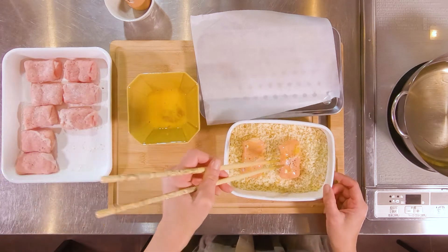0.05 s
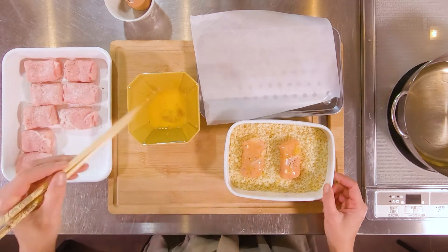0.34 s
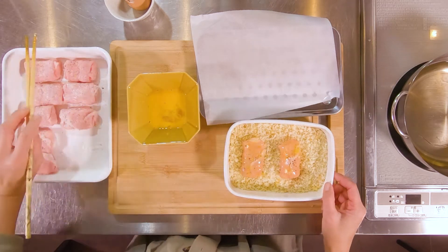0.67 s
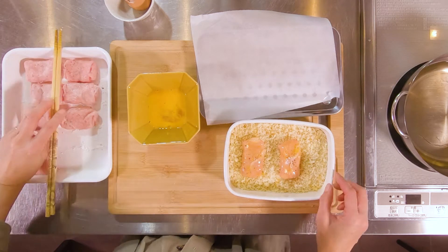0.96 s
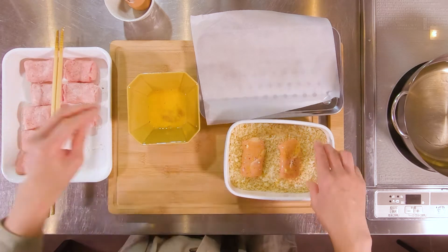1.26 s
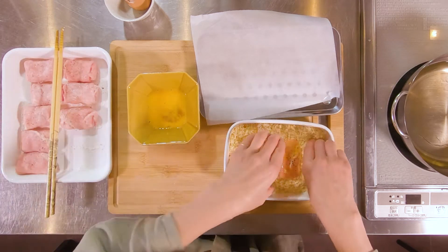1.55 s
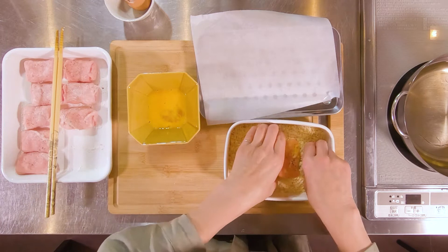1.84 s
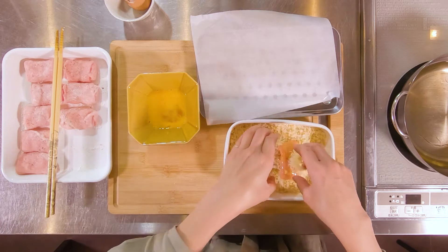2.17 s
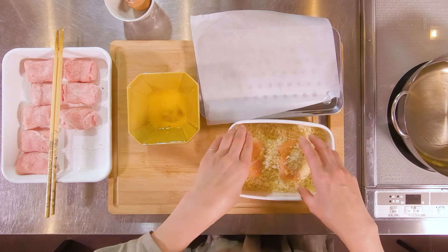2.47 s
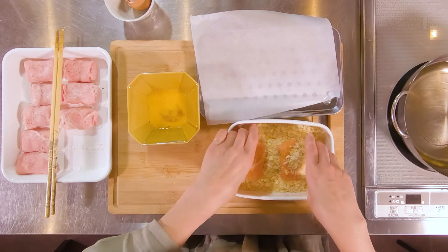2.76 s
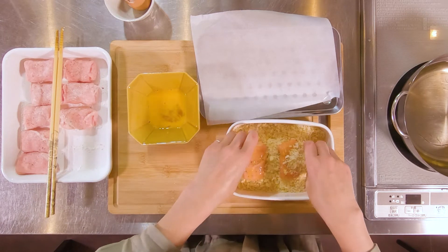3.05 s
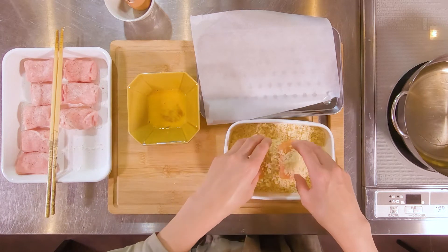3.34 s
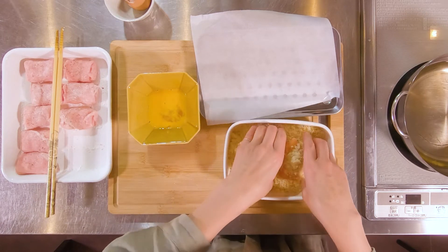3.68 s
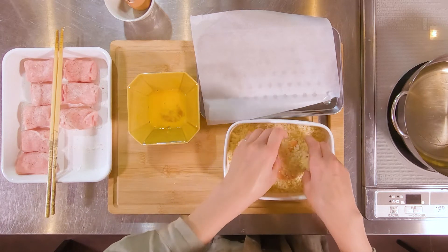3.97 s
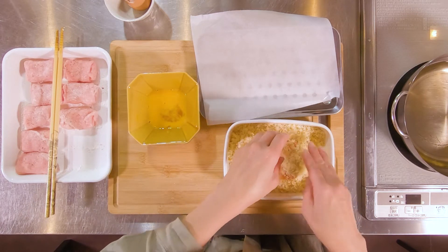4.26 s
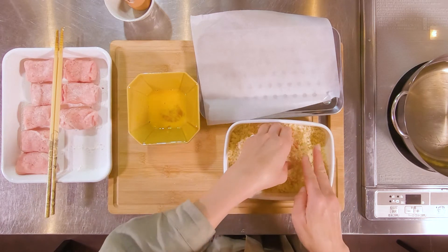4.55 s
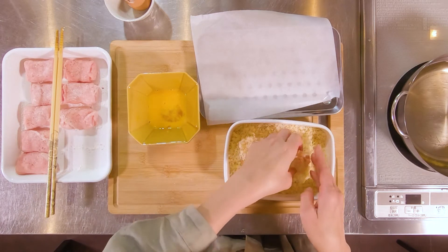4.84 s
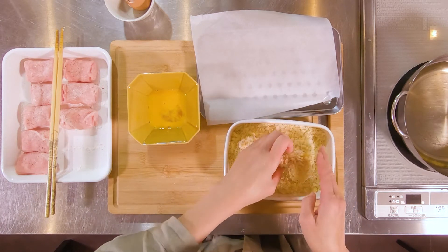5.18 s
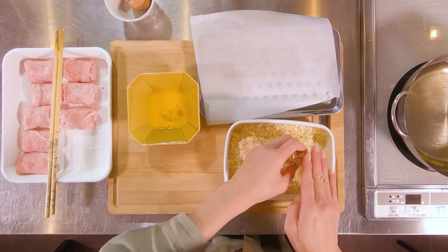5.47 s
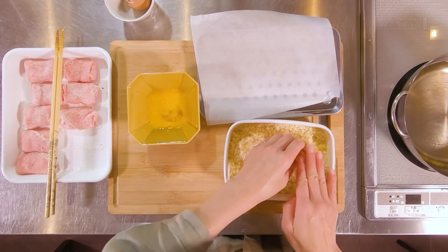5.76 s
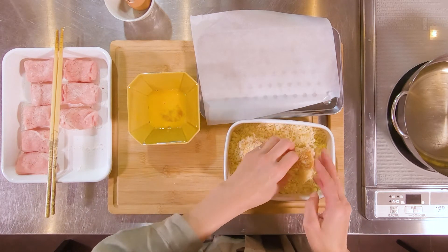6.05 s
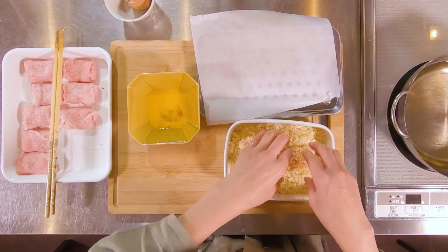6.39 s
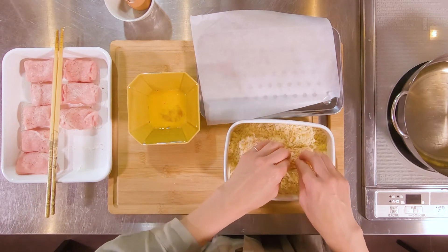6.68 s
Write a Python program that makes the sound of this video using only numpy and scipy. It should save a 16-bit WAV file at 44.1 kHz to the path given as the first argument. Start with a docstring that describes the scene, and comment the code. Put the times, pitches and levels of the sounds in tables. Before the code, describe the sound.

A kitchen fan hums steadily with a faint whine in a slightly echoing room. Near the microphone, chopsticks tick together and drop onto a tray in a short, bright clatter, the loudest sound. Quieter work follows: dry breadcrumbs sift, crackle and crunch in uneven strokes as hands pack them onto meat, with a few fingertip ticks, one soft squeak and occasional dull knocks of the dish on a wooden board.

```python
"""Long bamboo chopsticks click in a cook's hand and clatter onto a tray, each bounce ringing shaft and tip.
Then the hands scoop dry breadcrumbs over meat rolls and press them on: a crunch of countless tiny breaks. Now
and then the dish bumps on its wooden board, and once a finger rubs along its wall with a soft squeak. A kitchen
fan drones underneath with a thin whine, and the hard-walled room answers the cook's work."""
import sys
import numpy as np
from scipy import signal
from scipy.fft import rfft, irfft, next_fast_len
from scipy.io import wavfile
from scipy.ndimage import map_coordinates

SR = 44100
rng = np.random.default_rng(int(sys.argv[2]) if len(sys.argv) > 2 else 0)


def master_out(mix):
    """Clip the mix to full scale and print it as 16-bit PCM to the path in sys.argv[1]."""
    frames = np.transpose(np.atleast_2d(mix))
    ceiling = np.clip(frames, -1, 1)
    pcm = np.round(ceiling * 32767).astype(np.int16)
    wavfile.write(sys.argv[1], SR, pcm)


N = 305172

# Colour of the fan's rushing air and of the hiss above it: (frequency [Hz], gain [dB])
AIR_EQ = [(25, -33), (48, -22.5), (70, -35), (110, -29), (150, -11), (235, -3.5), (268, -12), (330, -12),
          (390, -20), (520, -21.5), (800, -21.5), (1050, -24.5), (1550, -25), (2200, -33.5), (3600, -60)]
HISS_EQ = [(1500, -12), (3000, 7.5), (5600, 2), (7000, 0), (9000, 0.5), (12000, -7), (13500, -19.5),
           (15000, -43)]
# Stereo image of the air: (frequency [Hz], left-right likeness [0-1])
AIR_IMAGE = [(40, 0.85), (200, 0.87), (330, 0.97), (550, 0.26), (950, 0.03), (1400, 0.094), (2200, 0.23),
             (4000, .4)]
# The fan's duct tones: (pitch [Hz], width [Hz], level [dB])
DUCT_TONES = [(153.9, 12, -57), (198.9, 11, -46.5), (295.2, 12, -52), (448, 6.5, -73), (583, 3.4, -68),
              (787, 4.5, -63.5)]
# Slow swell of the air and duct tones: (time [s], gain [dB])
FAN_SWELL = [(0, -2), (0.7, 3), (2.0, -0.5), (2.7, 1.5), (5.0, 1), (6.92, 1.5)]
# Fades of the fan's whine: (time [s], level [dB])
WHINE_FADES = [(0, -59), (0.65, -45), (1.2, -48.5), (2.1, -53.5), (2.55, -50.5), (3.35, -55), (4.05, -51.5),
               (4.95, -56), (5.8, -54), (6.4, -53), (6.92, -50.5)]
WHINE_HZ = 749.4

# Chopsticks touching in the hand: (time [s], level [dB], lows [dB], highs [dB])
STICK_CLICKS = [(0.076, -59.5, -9, 13), (0.2948, -27.5, -4, -0.5), (0.299, -35.5, -3.5, -2.5),
                (.715, -39.5, 20.5, -4.5)]
# Ring of the held sticks: (frequency [Hz], width [Hz], gain [dB])
HELD_STICK_MODES = [(1580, 180, -17.5), (2160, 200, -16.5), (2760, 240, -11.5), (3913, 110, -6),
                    (4200, 160, -11), (5090, 180, -2.5), (5378, 150, -5), (6120, 200, -2.5),
                    (6606, 140, -1.5), (6950, 110, -7), (7520, 150, -7.5), (7900, 140, -5.5),
                    (9370, 240, -7.5), (10710, 300, -9), (12660, 980, -18.5)]
# Sticks sliding through the fingers: (time [s], level [dB], pitch [Hz], t60 [s])
STICK_SLIDES = [(0.446, -46.5, 6440, 0.15), (0.474, -48.5, 4800, 0.21), (0.531, -41.5, 3200, 0.16)]
# Sticks landing and bouncing: (time [s], level [dB], lows [dB], highs [dB], tray gain [dB],
# shaft mode [Hz], shaft gain [dB], tip mode [Hz], tip gain [dB], lingering ring [dB])
STICK_LANDINGS = [(0.7526, -10.5, 1.5, -2.5, -17, 3250, -11, 7900, -24.5, -50.5),
                  (0.845, -7.5, -5, -6.5, 11.5, 5000, -1.5, 9480, -11.5, -36),
                  (0.8609, -5.5, 6, 4.5, 7.5, 3100, -8, 8650, -20, -34),
                  (0.9269, -5.5, -2.5, 5.5, 28, 4880, -9, 9000, -18, -37)]
# Ring of a dropped stick: (frequency [Hz], width [Hz], gain [dB])
DROPPED_STICK_MODES = [(679, 220, -9.5), (1241, 190, -5.5), (2352, 300, -.5), (2760, 84, 0.5),
                       (3047, 60, 2), (3350, 108.5, 6), (4360, 600, -6.5), (4920, 230, -1.5),
                       (5410, 250, -1), (5920, 74, 7), (6650, 120, 1.5), (6800, 66, -4), (7800, 350, -6.5),
                       (9550, 240, -8.5), (10290, 300, -18.5), (11250, 180, -9.5), (12770, 260, -14.5)]
# Colour of the shaken tray: (frequency [Hz], gain [dB])
TRAY_EQ = [(100, -43.5), (280, -12), (400, -3.5), (560, 0), (760, -2.5), (1100, -3.5), (1800, -5.5),
           (2300, -1.5), (3700, 1), (4600, 0.5), (5600, -5), (7100, -9), (8600, -4), (10300, -22),
           (14400, -29.5)]
# Lingering ring of the loose sticks on the tray: (frequency [Hz], t60 [s], gain [dB])
LINGERING_MODES = [(2078, .45, -11), (2188, .4, -9), (2446, .35, -8), (2725, .35, -7), (2827, .4, -6),
                   (2900, .62, -6), (3042, .4, -7), (3168, .35, -7), (3316, .35, -9), (3688, .5, -9),
                   (4559, .35, -7), (4716, .42, -5), (5253, .42, 8), (5748, .3, -9), (7800, .35, -10)]
# The sticks lie off to one side: (frequency [Hz], phase lead of the left channel [rad])
STICK_PHASE_LEAD = [(300, 0.2), (3000, 0.9), (5200, -2), (9000, -3), (14000, -2)]
SHAFT_WIDTH_HZ, TIP_WIDTH_HZ = 340, 290  # damping of the two modes that a blow favours
STICK_LOW_HZ, STICK_HIGH_HZ = 217.6, 12500  # thin bamboo radiates little outside this range

# Hand strokes through the crumbs: (time [s], rise [s], hold [s], crush level [dB],
# fine crumbs over crush [dB], dish wall over crush [dB])
HAND_STROKES = [(1.284, 0.18, 0.034, -45, -2.5, -7), (1.589, .02, 0.036, -50, -3, -3),
                (1.689, 0.053, 0.15, -43.5, -7.5, -11.5), (1.983, 0.066, 0.19, -68.5, 3, -12),
                (2.308, 0.053, 0.025, -56, -6, -3.5), (2.498, 0.054, 0.084, -51, 0.5, -0.5),
                (2.624, 0.047, .035, -45, 2, -5), (2.771, 0.045, 0.038, -44, -3, -3.5),
                (2.874, 0.032, 0.06, -49.5, 0, 3.5), (3.004, 0.084, 0.19, -66.5, 4, -12.5),
                (3.548, 0.048, 0.046, -39, -5, -5.5), (3.773, 0.056, 0.096, -55, -2.5, -16),
                (3.938, 0.055, 0.22, -65, 1.5, -8.5), (4.328, 0.043, 0.23, -47.5, -7.5, -7.5),
                (4.572, 0.1, 0.038, -43, -8.5, -13), (4.79, 0.035, 0.18, -57.5, 2.5, -9.5),
                (5.297, 0.031, 0.034, -53, -4, -5), (5.669, 0.16, 0.11, -59, -10, -14)]
# Quick squeezes of a heap: (time [s], burst level [dB], burst length [s], cupped-hand gain [dB],
# crush level of the bed below [dB], fine crumbs over crush [dB])
HEAP_SQUEEZES = [(1.52, -44, 0.051, -23, -49.5, 4), (1.537, -39.5, 0.013, -10, -57, -2),
                 (2.307, -61, 0.022, -10, -56, -3), (3.677, -40, 0.027, -13, -39.5, -9),
                 (3.749, -41.5, 0.031, -2.5, -37, -15.5), (4.353, -46, 0.056, 3, -52.5, -3.5),
                 (5.064, -40, 0.041, 6, -38, -8.5), (5.514, -52, 0.016, 0.5, -53.5, -4),
                 (5.547, -36.5, 0.027, -0.5, -39.5, -4.5), (5.982, -51.5, 0.042, 12, -43.5, -10),
                 (6.026, -50, 0.043, 8, -45, -9), (6.61, -47, 0.043, 6, -43.5, -10),
                 (6.817, -51, 0.041, 3.5, -45, -9), (6.839, -38.5, 0.035, 13, -39.5, -11.5)]
# Colour of coarse crumbs crushing, fine ones sifting and a heap giving way: (frequency [Hz], gain [dB])
CRUSH_EQ = [(300, -18), (600, -6.5), (1000, 5), (1650, 7), (2000, 3), (2300, 6.5), (2650, 3), (3250, 4),
            (4400, -9.5), (6000, -7.5), (9000, -27.5), (14000, -40)]
SIFT_EQ = [(2000, -18), (4000, -2), (5800, 1), (7200, -1.5), (8400, 1.5), (9600, 2), (10500, -7),
           (12500, -6), (14000, -19), (15500, -24)]
HEAP_EQ = [(500, -21), (1000, -12.5), (2200, 11), (3200, 12), (4400, 11.5), (6000, -4), (9500, 3.5),
           (14000, -17)]
# Stereo image of the crumbs: (frequency [Hz], left-right likeness [0-1])
CRUMB_IMAGE = [(400, 0.6), (1100, 0.395), (2200, 0.627), (3800, 1), (6000, 0.17), (12000, .15)]
# Large flakes, one row a size: (pitch [Hz], width [Hz], level over the crumbs around them [dB])
FLAKE_BANDS = [(2306, 1100, -17), (3453, 1800, -16), (5280, 2300, -12), (8620, 1500, -15.5)]
# Hollow of a hand cupped over the dish: (frequency [Hz], width [Hz], gain [dB])
CUPPED_HAND_MODES = [(1635, 74, 11), (2395, 1400, -11), (2880, 130, -11), (4260, 120, -22)]
# Lone crumbs snapping: (time [s], level [dB], pitch [Hz])
CRUMB_SNAPS = [(1.361, -46, 8650), (1.371, -45, 5200), (2.523, -54, 8400), (3.268, -53.5, 8560),
               (4.757, -42.5, 8500), (5.857, -48.5, 8600), (6.628, -62, 8600), (6.825, -48, 8300)]
STROKE_SAG_DB_PER_S, STROKE_RELEASE_DB_PER_S = 19, 126  # crumbs pack down, then come to rest
BED_RISE_S, BED_HOLD_S, BED_RELEASE_DB_PER_S = 0.018, 0.0031, 324  # the bed gives way under a squeeze
BED_WALL_DB, REST_DB = -14, -100  # wall scrape over the crush in a squeeze; envelope floor
COARSE_ONSET, FINE_ONSET = 1.4, 0.85  # attack exponents: coarse crumbs need force, fine ones stir at once

# The dish bumping on the board: (time [s], knock level [dB], thump over knock [dB], thud level [dB])
DISH_BUMPS = [(1.3951, -24, 0, -43), (2.529, -34.5, 8, -50), (2.894, -37.5, 10, -49),
              (3.789, -28.5, 5, -58), (3.858, -40.5, 7, -50), (4.6426, -28, 4.5, -47),
              (4.69, -44, 13, -55.5), (6.8535, -20, 0, -43)]
# Fingertips ticking on the dish: (time [s], level [dB], lows [dB], highs [dB])
FINGER_TAPS = [(3.102, -47.5, -10, 27), (5.022, -36.5, 7.5, 18.5), (5.14, -46, -14, 7),
               (5.226, -45, 13, 11)]
# The dish's bright ring, its dull knock and the board's thump: (frequency [Hz], width [Hz], gain [dB])
DISH_RING_MODES = [(718, 9, 12.5), (1518, 53, 5.5), (2199, 46, 4.5), (2830, 38, 0), (3170, 90, -1),
                   (3560, 20, 4.5), (3836, 40, -3), (4430, 44, -1), (5170, 89, -8.5), (6340, 52, -8),
                   (8130, 70, -5)]
DISH_KNOCK_MODES = [(490, 84, -2.5), (660, 114, -3), (917, 94, 3), (1187, 116, 5), (1540, 230, -2.5)]
BOARD_MODES = [(143, 29.6, 17.5), (189, 39, 13), (313, 100, -23), (439, 55, -9.5)]
KNOCK_HZ, KNOCK_HARDENING = 4500, 0.5  # cutoff of a full-scale knock; it follows this power of the force
TICK_CRACK_DB = -0.5  # dry crack of a tick, over the dish's ring
WORKTOP_HZ, WORKTOP_RISE_S, WORKTOP_T60_S = 66.5, 0.012, 0.2  # the deep mode under the board
RUB_S, RUB_RISE_S, RUB_HOLD_S, RUB_DB = 2.53, 0.042, 0.11, -51
SQUEAK_S, SQUEAK_RISE_S, SQUEAK_HOLD_S, SQUEAK_DB, SQUEAK_HZ = 2.615, 0.04, 0.057, -44, 720

# Early reflections off the steel worktop and the wall: (left delay [s], right delay [s], gain [dB])
REFLECTIONS = [(.0021, .0022, -16), (.0037, .0036, -15), (.0058, .0061, -16), (.0094, .0089, -16)]
# Reverb time of the kitchen: (frequency [Hz], t60 [s])
ROOM_DECAY = [(200, 0.4), (700, 0.63), (2500, 0.59), (5000, 0.53), (8000, 0.45), (13000, 0.43)]
# Stereo image of the reverb: (frequency [Hz], left-right likeness [0-1])
ROOM_IMAGE = [(200, 0.42), (550, 0.38), (1100, 0.63), (2200, 0.63), (4000, 0.12), (6000, 0.01216),
              (12000, 0.098)]
# Colour of the microphone pair: (frequency [Hz], left minus right [dB])
MIC_BALANCE = [(200, -.5), (1000, 1), (5500, -0.5), (7600, -3.5), (10000, -5.5), (14000, 2.5)]
TOP_HZ = 14900

IMPULSE = signal.unit_impulse(SR // 8)


def amp(db):
    """Decibels to linear gain."""
    return 10 ** (np.asarray(db) / 20)


def unit(x):
    """Normalise to an rms of 1."""
    return x / np.sqrt(np.mean(x ** 2) + 1e-20)


def along(points, hz):
    """Read a (frequency, value) curve on a log axis."""
    freqs, values = np.transpose(points)
    return np.interp(np.log(hz + 1), np.log(freqs + 1), values)


def wobble(rate):
    """A smooth random modulator with rate knots a second."""
    steps = np.arange(0, N + 32, 32)
    knots = rng.standard_normal(2048)
    return np.interp(np.arange(N), steps, map_coordinates(knots, [steps * rate / SR], mode="wrap"))


def filtered(x, response):
    """Filter x by a complex response, a function of frequency."""
    n = x.shape[-1]
    padded = next_fast_len(n + SR // 8, True)
    return irfft(rfft(x, padded) * response(np.fft.rfftfreq(padded, 1 / SR)), padded)[..., :n]


def resonate(x, modes):
    """Play x through a bank of resonators of alternating polarity."""
    return filtered(x, lambda f: sum((-1) ** k * amp(db) * 1j * f * width / (hz**2 - f**2 + 1j * f * width)
                                     for k, (hz, width, db) in enumerate(modes)))


def band(x, hz, width):
    """A broad resonance with steep skirts."""
    return resonate(resonate(x, [(hz, width, 0)]), [(hz, width, 0)])


def causal(gain):
    """The minimum-phase response with this gain: no ringing ahead of the hit."""
    cepstrum = irfft(np.log(gain + 1e-6))
    half = len(cepstrum) // 2
    return np.exp(rfft(np.r_[cepstrum[0], 2 * cepstrum[1:half], np.zeros(half)]))


def spread(pair, eq, image):
    """Two unrelated signals become mid and side of a coloured stereo sound of rms 1."""
    def mid_side_gains(hz):
        angle = np.arccos(np.clip(along(image, hz), -1, 1)) / 2
        return amp(along(eq, hz)) * [np.cos(angle), np.sin(angle)]
    mid, side = filtered(pair, mid_side_gains)
    return unit(np.array([mid + side, mid - side]))


def add(track, s, sound):
    """Mix a sound into a stereo track at s seconds."""
    start = max(round(s * SR), 0)
    track[:, start:start + sound.shape[-1]] += sound[:, :max(N - start, 0)]


def blow(t60, rattle_db, rattle_t60, width):
    """Stereo force of one contact: a short crack with a weaker, longer chatter."""
    t = np.arange(SR * 3 // 5) / SR
    noise = rng.standard_normal((3, len(t)))
    return (noise[0] + width * noise[1:]) * (amp(-60 * t / t60) + amp(rattle_db - 60 * t / rattle_t60))


def firm(force, point_db):
    """A hard contact: one clean impulse ahead of its chatter."""
    return force / np.linalg.norm(force[0]) + amp(point_db) * signal.unit_impulse(force.shape[-1])


def tinted(hit, low_db, high_db):
    """Where a body is struck sets the weight of its low and high modes."""
    tilt = [(900, low_db), (2800, low_db / 2), (5000, 0), (9000, high_db), (14500, high_db - 5)]
    return filtered(hit, lambda hz: causal(amp(along(tilt, hz))))


def sized(hit, db):
    """Give a hit the energy of two milliseconds at db."""
    return hit * amp(db) * np.sqrt(0.002 * SR / np.mean(np.sum(hit ** 2, -1)))


def fan():
    """Rushing air and fuzzy duct tones swell together over a faint hiss."""
    t = np.arange(N) / SR
    swell = amp(np.interp(t, *np.transpose(FAN_SWELL)))
    air = amp(-45) * spread(rng.standard_normal((2, N)), AIR_EQ, AIR_IMAGE)
    tones = 0
    for hz, width, db in DUCT_TONES:
        steady = (5 / width) ** 2  # narrow tones hold steadier than wide ones
        flutter = steady + wobble(2 * width) + 1j * wobble(2 * width)
        tones += amp(db) * unit(np.real(flutter * np.exp(2j * np.pi * hz * t)))
    hiss = amp(-70) * spread(rng.standard_normal((2, N)), HISS_EQ, image=[(3000, 0.41), (7000, 0.026)])
    return swell * (air + tones) + hiss


def fan_whine():
    """One thin, clean tone of the fan, swelling and fading."""
    t = np.arange(N) / SR
    hz = WHINE_HZ + 0.69 * wobble(3)
    level_db = np.interp(t, *np.transpose(WHINE_FADES)) + 0.6 * wobble(7)
    return amp(level_db) * unit(np.sin(2 * np.pi * np.cumsum(hz) / SR))


def sticks_in_hand():
    """The carried chopsticks click together and swish through the fingers."""
    out = np.zeros((2, N))
    t = np.arange(SR // 2) / SR
    ring = resonate(IMPULSE, HELD_STICK_MODES)
    for s, db, low_db, high_db in STICK_CLICKS:
        force = blow(t60=0.011, rattle_db=-16, rattle_t60=0.0786, width=1)
        click = sized(tinted(ring, low_db, high_db), db)
        add(out, s, struck(click, force, wet_db=1, left_db=-3))
    for s, db, hz, t60 in STICK_SLIDES:
        friction = rng.standard_normal((2, len(t)))
        skin = filtered(friction, lambda f: 1 / (1 + (f / 10500) ** 8))  # soft fingers make little top
        envelope = amp(db - 60 * t / t60) * (1 - np.exp(-t / 0.005))
        add(out, s, kitchen(unit(band(skin, hz, 0.99 * hz)) * envelope, wet_db=-0.5))
    return out


def struck(ring, force, wet_db, left_db):
    """A ringing body is hit: direct sound from one side, reverb from all round."""
    direct = force / np.linalg.norm(force[0]) * amp([[left_db / 2], [-left_db / 2]])
    return signal.fftconvolve(direct + amp(wet_db) * room_tail(), ring[None], axes=1)


def room_tail(build_s=0.0051):
    """A fresh stereo reverb tail of energy 1 that blooms and hangs longest in the mids."""
    noise = spread(rng.standard_normal((2, SR * 3 // 5)), eq=[(1, 0)], image=ROOM_IMAGE)
    hz, t, spectra = signal.stft(noise, SR, nperseg=256)
    envelope = amp(-60 * t / along(ROOM_DECAY, hz)[:, None]) * (1 - np.exp(-t / build_s))
    _, tail = signal.istft(spectra * envelope, SR, nperseg=256)
    return tail[:, :noise.shape[-1]] / np.linalg.norm(tail[0])


def kitchen(x, wet_db):
    """The dry sound plus the hard walls' reverb, sent from its left channel."""
    return x + amp(wet_db) * signal.fftconvolve(x[:1], room_tail(), axes=1)[:, :x.shape[-1]]


def early_reflections(x):
    """Near hard surfaces send back weak copies, which comb the spectrum."""
    return filtered(x, lambda hz: 1 + sum(amp(db) * np.exp(-2j * np.pi * np.outer(delays, hz))
                                          for *delays, db in REFLECTIONS))


def stick_clatter():
    """Tips land first, then shafts bounce and shake the tray; each contact favours its own modes."""
    clacks, ring = np.zeros((2, 2, N))
    stick = unit(resonate(IMPULSE, DROPPED_STICK_MODES))
    tray = unit(filtered(IMPULSE, lambda hz: causal(amp(along(TRAY_EQ, hz)))))
    for s, db, low_db, high_db, tray_db, shaft_hz, shaft_db, tip_hz, tip_db, ring_db in STICK_LANDINGS:
        body = unit(tinted(stick + amp(tray_db) * tray, low_db, high_db))
        shaft = amp(shaft_db) * unit(resonate(IMPULSE, [(shaft_hz, SHAFT_WIDTH_HZ, 0)]))
        tip = amp(tip_db) * unit(resonate(IMPULSE, [(tip_hz, TIP_WIDTH_HZ, 0)]))
        force = firm(blow(t60=0.023, rattle_db=-7, rattle_t60=0.07, width=0.71), point_db=-5)
        add(clacks, s, struck(sized(body + shaft + tip, db), force, wet_db=-1.5, left_db=-4.5))
        add(ring, s, amp(ring_db) * lingering_ring())
    radiated = filtered(clacks, lambda hz: (1j * hz / (STICK_LOW_HZ + 1j * hz)) ** 2
                        / np.sqrt(1 + (hz / STICK_HIGH_HZ) ** 20))
    placed = filtered(radiated, lambda hz: np.exp(0.5j * np.outer([1, -1], along(STICK_PHASE_LEAD, hz))))
    return ring + placed


def lingering_ring():
    """The sticks' long-lived modes sing on, varying a little from blow to blow and from left to right."""
    t = np.arange(SR * 3 // 5) / SR
    ring = 0
    for hz, t60, db in LINGERING_MODES:
        phase = rng.uniform(0, 2 * np.pi) + rng.normal(0, 0.5, (2, 1))
        ring += amp(db + rng.normal(0, 1.5) - 60 * t / t60) * np.sin(2 * np.pi * hz * t + phase)
    return ring * (1 - np.exp(-t / 0.002))


def push(s, rise, hold, release_db_per_s, onset):
    """Pressure envelope of one push: it builds, sags while held and is let go."""
    t = np.arange(N) / SR - s
    held = np.maximum(t - rise, 0)
    fall_db = STROKE_SAG_DB_PER_S * held + release_db_per_s * np.maximum(held - hold, 0)
    return np.clip(t / rise, 0, 1) ** onset * amp(np.maximum(-fall_db, REST_DB))


def hand_envelopes():
    """Envelopes in dB for crush, sift and wall scrape; overlapping pushes add in power."""
    power = np.full((3, N), amp(REST_DB) ** 2)
    for s, rise, hold, db, fine_db, wall_db in HAND_STROKES:
        coarse = amp(db) * push(s, rise, hold, STROKE_RELEASE_DB_PER_S, COARSE_ONSET)
        fine = amp(db + fine_db) * push(s, rise, hold, STROKE_RELEASE_DB_PER_S, FINE_ONSET)
        power += np.square([coarse, fine, amp(wall_db) * coarse])
    for s, _, _, _, db, fine_db in HEAP_SQUEEZES:
        bed = amp(db) * push(s, BED_RISE_S, BED_HOLD_S, BED_RELEASE_DB_PER_S, COARSE_ONSET)
        power += np.square([bed, amp(fine_db) * bed, amp(BED_WALL_DB) * bed])
    return 10 * np.log10(power)


def fractures(level_db, rate, scatter_db):
    """Two streams of tiny random breaks, thickening with pressure up to rate a second."""
    shape = (2, len(level_db))
    chance = np.clip(rate / SR * amp((level_db - level_db.max()) / 2), 1e-4, 1)
    sizes = amp(scatter_db * np.clip(rng.standard_normal(shape), -2, 2)) * rng.choice([-1, 1], shape)
    return (rng.random(shape) < chance) * sizes / np.sqrt(chance)


def crumbs():
    """Coarse flakes crush under the palms, fine ones sift, and those on the wall ring the dish."""
    crush_db, sift_db, wall_db = hand_envelopes()
    clumps_db = wobble(110) + 0.8 * wobble(45)  # flakes give way in clumps
    crush = spread(fractures(crush_db, rate=2300, scatter_db=-1), CRUSH_EQ, CRUMB_IMAGE)
    crush *= amp(crush_db + clumps_db - 3.5)
    sift = spread(fractures(sift_db, rate=5800, scatter_db=-1.5), SIFT_EQ, CRUMB_IMAGE)
    sift *= amp(sift_db + clumps_db + 1)
    crackle = flake_crackle((crush_db + sift_db) / 2)
    mid, side = fractures(crush_db, rate=5100, scatter_db=1.5)
    scrape = mid + np.outer([0.5, -0.5], side)
    ring = unit(resonate(scrape, DISH_RING_MODES)) * amp(wall_db)
    return kitchen(crush + sift + crackle + ring, wet_db=-6)


def flake_crackle(level_db):
    """Large flakes crack one by one, each size at its own pitch."""
    cracks = 0
    for hz, width, db in FLAKE_BANDS:
        mid, side = fractures(level_db, rate=260, scatter_db=3.5)
        cracks += amp(db) * unit(band(mid + np.outer([0.566, -0.566], side), hz, width))
    return cracks * amp(level_db)


def crunches():
    """A squeezed heap gives way in one burst, hollow under a cupped hand; lone crumbs snap."""
    out = np.zeros((2, N))
    t = np.arange(SR // 2) / SR
    for s, db, length, cupped_db, _, _ in HEAP_SQUEEZES:
        heap = spread(fractures(np.zeros(len(t)), rate=3900, scatter_db=0.5), HEAP_EQ, CRUMB_IMAGE)
        burst = unit(heap + amp(cupped_db) * unit(resonate(heap, CUPPED_HAND_MODES)))
        envelope = amp(db) * np.sin(np.pi * np.minimum(t / length, 1))
        add(out, s, kitchen(burst * envelope, wet_db=-5))
    for s, db, hz in CRUMB_SNAPS:
        force = blow(t60=0.0028, rattle_db=-18, rattle_t60=0.033, width=0.55)
        add(out, s, kitchen(sized(band(force, hz, 0.31 * hz), db), wet_db=0))
    return out


def dish_bumps():
    """The pressed dish rocks: a dull knock, brighter when harder, over board thump and worktop thud."""
    out = np.zeros((2, N))
    for s, db, thump_db, thud_db in DISH_BUMPS:
        add(out, s, amp(thud_db) * worktop_thud())
        force = firm(blow(t60=0.018, rattle_db=-17, rattle_t60=0.08, width=0.43), point_db=1)
        cutoff_hz = KNOCK_HZ * amp(db) ** KNOCK_HARDENING
        softened = filtered(force, lambda hz: 1 / (1 + 1j * hz / cutoff_hz) ** 2)
        add(out, s, kitchen(sized(resonate(softened, DISH_KNOCK_MODES), db), wet_db=-4.5))
        shudder = resonate(blow(t60=0.083, rattle_db=-9.5, rattle_t60=0.22, width=0.94), BOARD_MODES)
        # a small board radiates little bass
        thump = filtered(shudder, lambda hz: (1j * hz / (140 + 1j * hz)) ** 6)
        add(out, s + 0.006, kitchen(sized(thump, db + thump_db), wet_db=-0.5))
    return out


def worktop_thud():
    """The worktop gives under a push and swings a few times."""
    t = np.arange(SR // 2) / SR
    swing = np.sin(2 * np.pi * WORKTOP_HZ * (1 + rng.normal(0, 0.074)) * t)
    envelope = (1 - np.exp(-t / WORKTOP_RISE_S)) * amp(-60 * t / WORKTOP_T60_S)
    return (swing * envelope)[None]


def dish_rub():
    """A finger rubs along the dish's wall: its low modes hum, then the fingertip sticks and slips in a soft
    squeak."""
    hum = amp(RUB_DB) * unit(resonate(rng.standard_normal(N), DISH_KNOCK_MODES))
    hum *= push(RUB_S, RUB_RISE_S, RUB_HOLD_S, STROKE_RELEASE_DB_PER_S, FINE_ONSET)
    slip_hz = SQUEAK_HZ * (1 + 0.0301 * wobble(90))
    squeak = amp(SQUEAK_DB) * unit(np.sin(2 * np.pi * np.cumsum(slip_hz) / SR))
    squeak *= push(SQUEAK_S, SQUEAK_RISE_S, SQUEAK_HOLD_S, BED_RELEASE_DB_PER_S, FINE_ONSET)
    return kitchen(np.tile(hum + squeak, (2, 1)), wet_db=-14)


def finger_taps():
    """Fingertips tick on the dish: a dry crack on top of its bright ring."""
    out = np.zeros((2, N))
    for s, db, low_db, high_db in FINGER_TAPS:
        touch = blow(t60=0.022, rattle_db=-4, rattle_t60=0.053, width=0.77)
        ring = unit(resonate(touch, DISH_RING_MODES))
        crack = amp(TICK_CRACK_DB) * unit(band(touch, hz=4000, width=3800))
        add(out, s, kitchen(sized(tinted(ring + crack, low_db, high_db), db), wet_db=1))
    return out


def scene():
    """The fan is the backdrop; the cook's work sits in front, coloured by the near surfaces."""
    backdrop = fan() + fan_whine()
    sticks = sticks_in_hand() + stick_clatter()
    breading = crumbs() + crunches()
    dish = finger_taps() + dish_bumps() + dish_rub()
    return backdrop + early_reflections(sticks + breading + dish)


def record(dry):
    """Master chain: a slight left-right tint, a hard clip at full scale and a steep high cut."""
    tinted_mix = filtered(dry, lambda hz: amp(np.outer([1, -1], along(MIC_BALANCE, hz)) / 2))
    return filtered(np.clip(tinted_mix, -1, 1), lambda hz: 1 / (1 + (hz / TOP_HZ) ** 50))


dry = scene()
out = record(dry)
master_out(out)
```